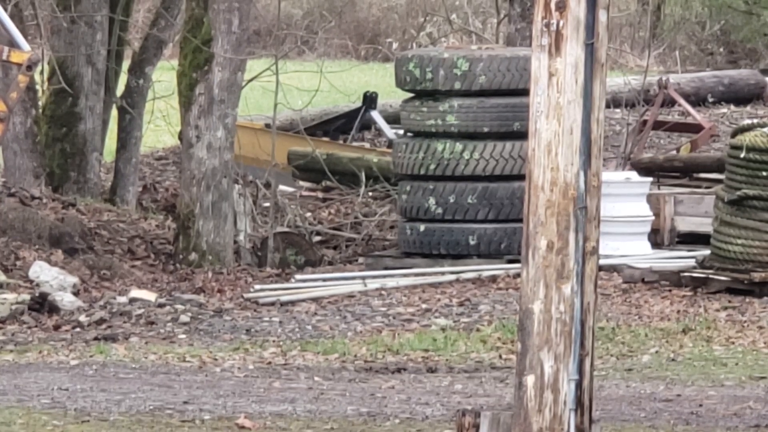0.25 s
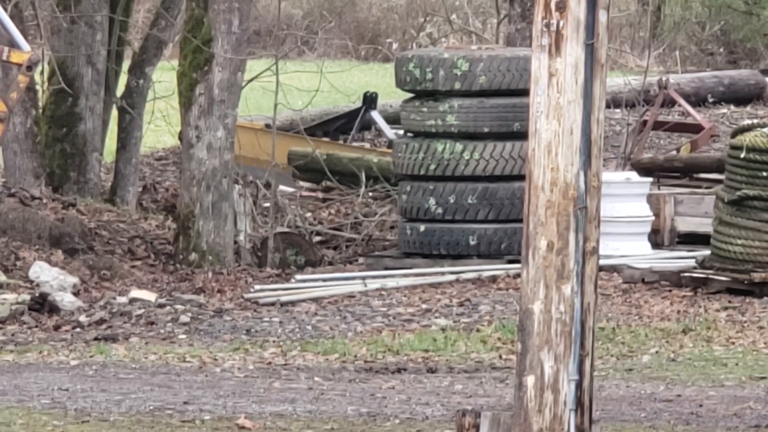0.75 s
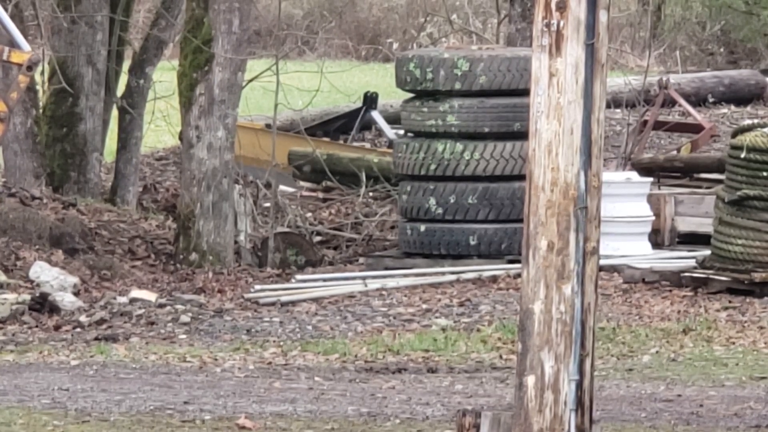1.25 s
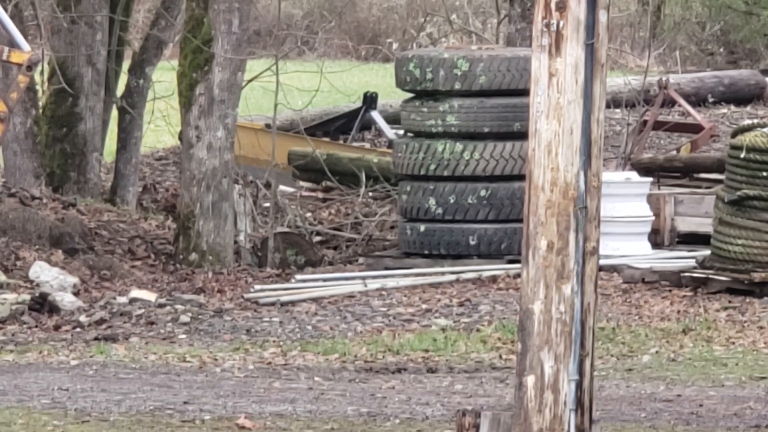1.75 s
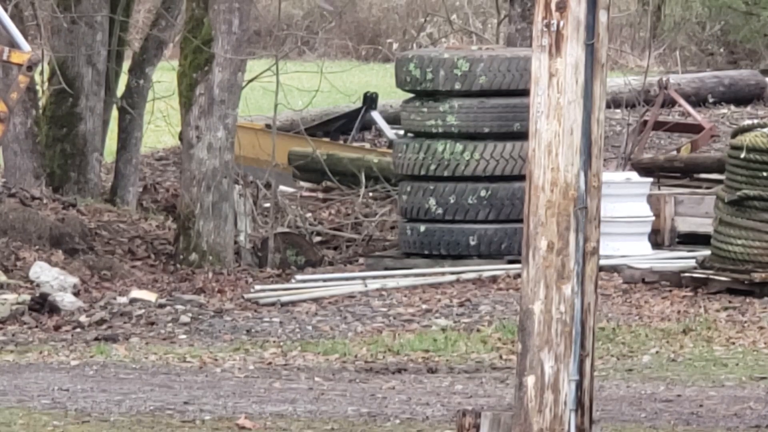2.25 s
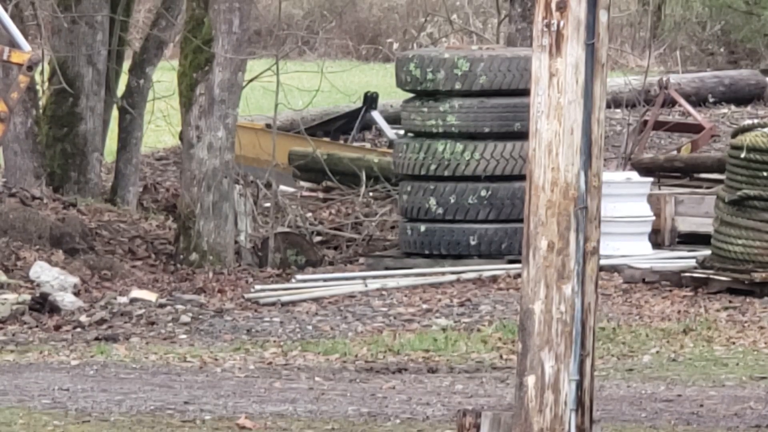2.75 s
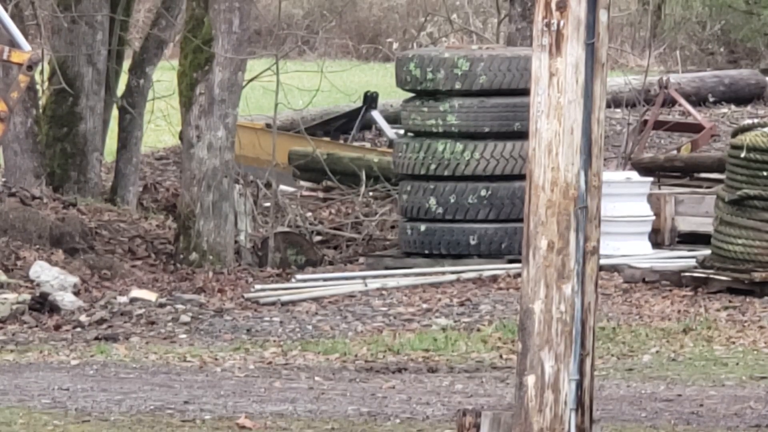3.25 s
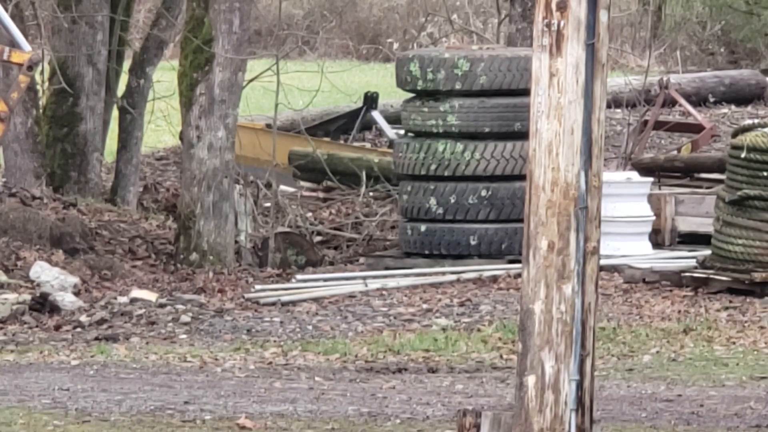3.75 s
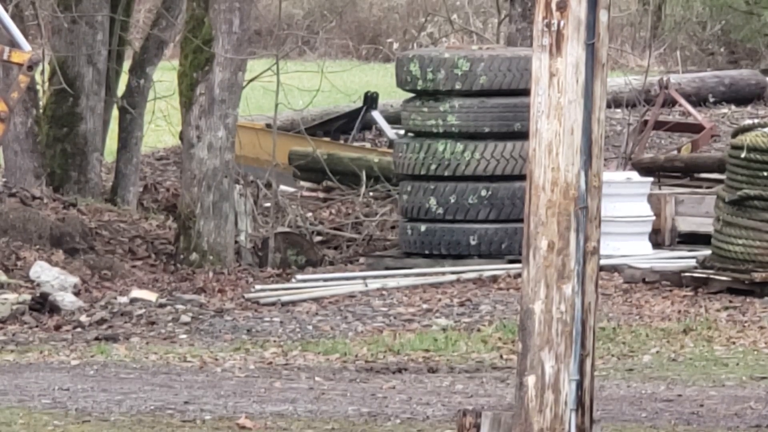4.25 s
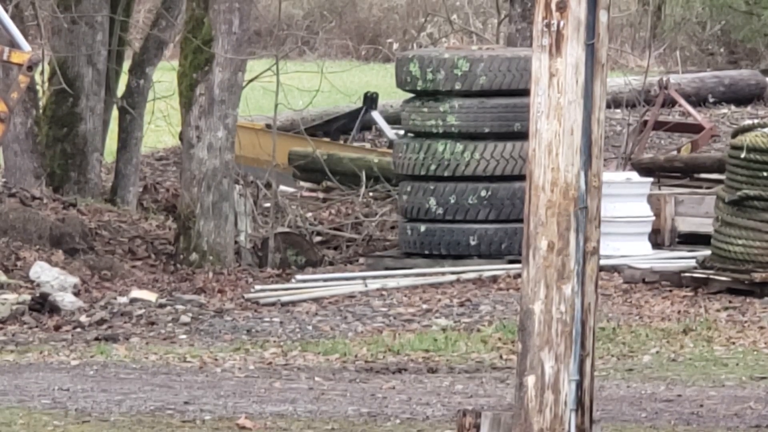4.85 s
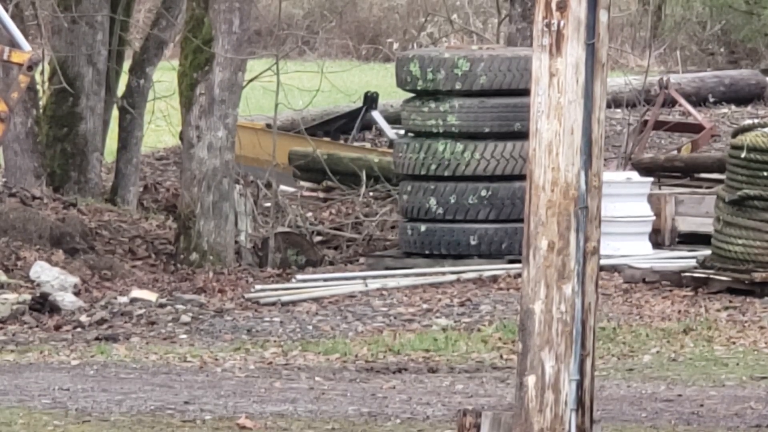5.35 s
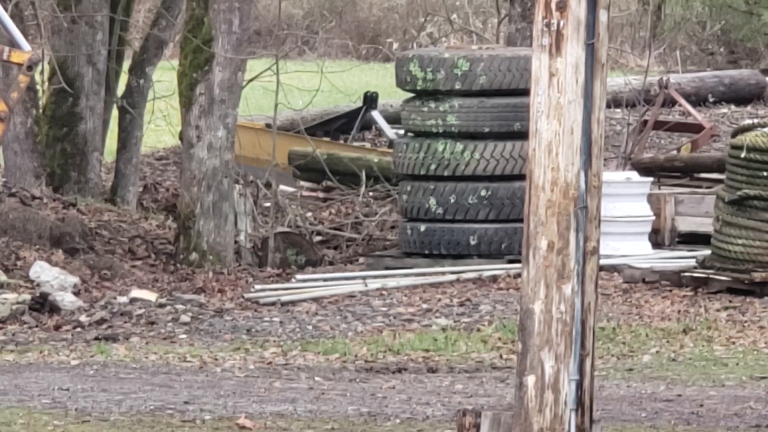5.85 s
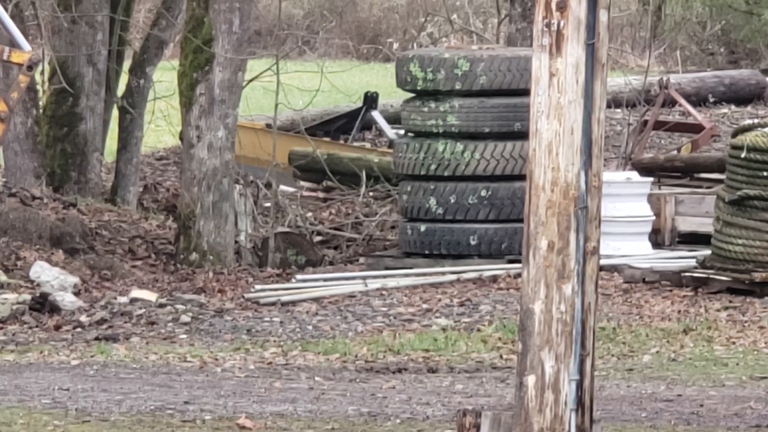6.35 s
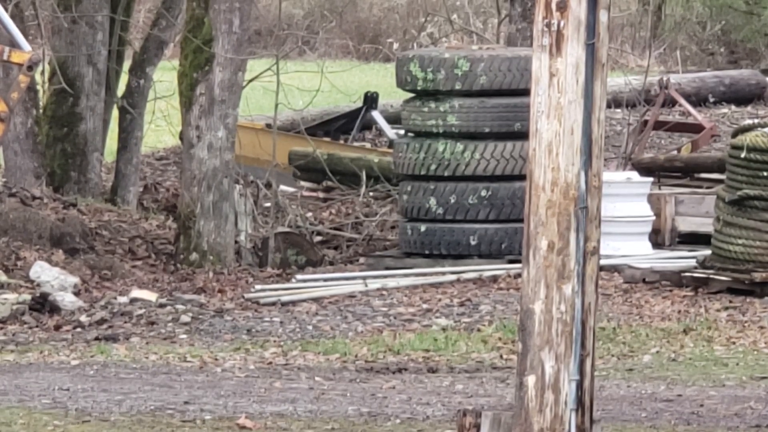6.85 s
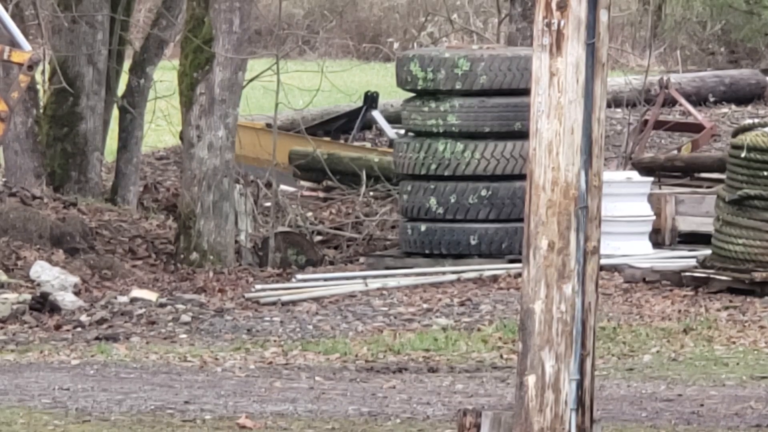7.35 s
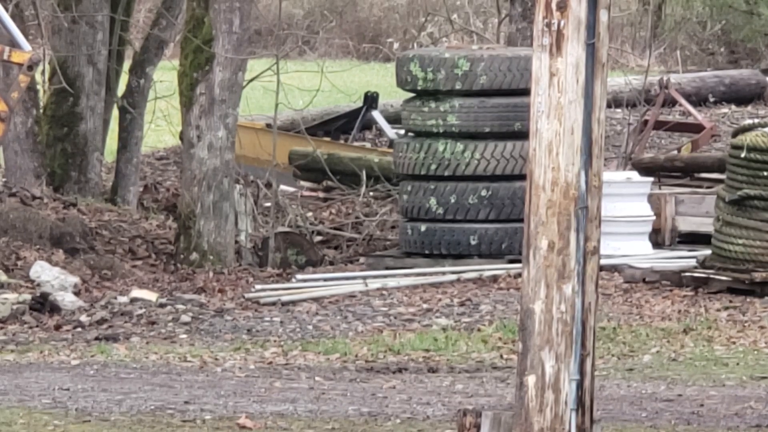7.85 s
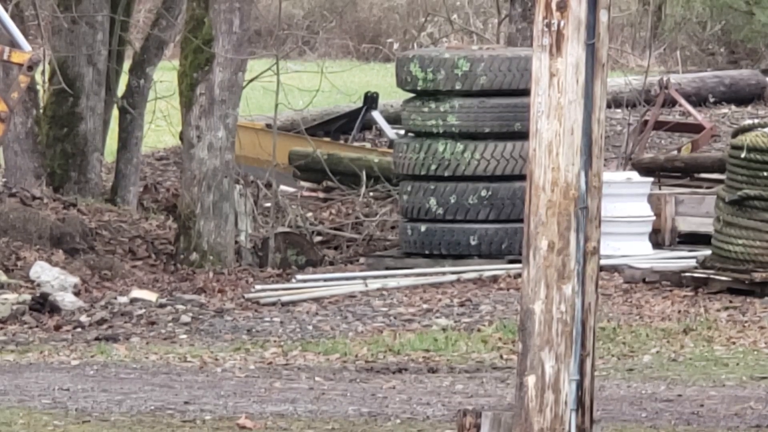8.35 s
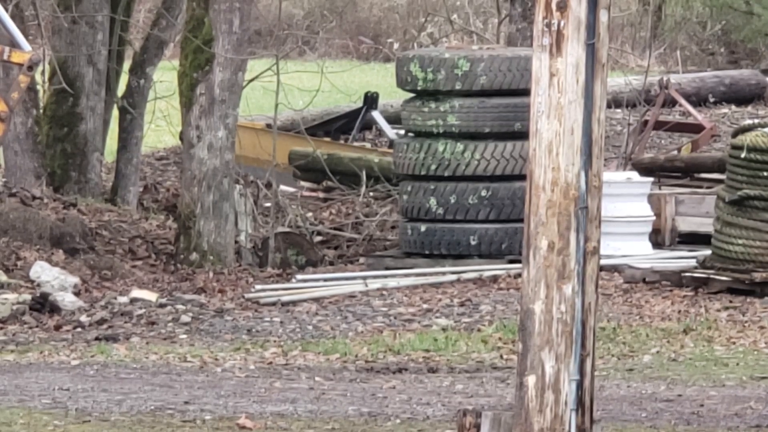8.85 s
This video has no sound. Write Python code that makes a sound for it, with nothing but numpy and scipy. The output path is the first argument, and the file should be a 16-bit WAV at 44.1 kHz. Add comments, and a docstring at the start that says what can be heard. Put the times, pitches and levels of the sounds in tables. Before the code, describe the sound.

Very close to the stereo microphone, a paintball marker fires dozens of crisp metallic snaps, each followed at once by a hissing, hollow gas pop. The nearby trees return a brief rough echo. Firing slows and stops, small trigger ticks follow, then balls knock and roll in a plastic hopper before another string of shots. A low windy rumble lies underneath.

```python
"""A low rumble, partly wind, and the dying echo of an earlier shot, then a paintball marker fires strings of
shots among trees. Each shot close to the two-port microphone is a falling sine click that rings the frame,
a burst of valve hiss, then a gas burst with the ringing barrel; the wood answers with a lumpy noise tail.
Thuds and trigger ticks, made of decaying sines, fall around the shots; faint whistles glide down after lone
ones. In the pause, balls knock and roll in the plastic hopper: struck modes with hiss and scraping noise."""
import sys
import numpy as np
from scipy import signal
from scipy.fft import rfft, irfft
from scipy.io import wavfile
from scipy.ndimage import uniform_filter1d

SR = 44100
rng = np.random.default_rng(int(sys.argv[2]) if len(sys.argv) > 2 else 0)


def unload_wav(signal):
    """Save mono or channel-first audio to the path in sys.argv[1] as 16-bit WAV at rate SR, clipped to [-1, 1]."""
    wavfile.write(
        sys.argv[1],
        SR,
        np.round(np.clip(np.atleast_2d(signal).T, -1, 1) * 32767).astype(np.int16),
    )


N = 401751

# Shots of the marker. Each row: click time in seconds, then click, barrel and gas levels in dB.
SHOTS = [(0.1517, -7.5, -28.5, -25.5), (0.4518, -8, -26.5, -25), (0.7331, -7.5, -27, -25.5),
         (0.851, -7.5, -26.5, -25), (0.9574, -7.5, -25.5, -24), (1.1402, -7.5, -27, -26.5),
         (1.216, -8, -26, -24.5), (1.3211, -7.5, -25.5, -24.5), (1.406, -8.5, -27.5, -26.5),
         (1.5164, -7.5, -27, -25), (1.5997, -8, -27, -25.5), (1.7129, -7.5, -27, -25.5),
         (1.7894, -8.5, -29, -26.7), (1.8935, -8.5, -27, -25), (2.1152, -8.5, -24.5, -24.5),
         (2.234, -9, -27, -26), (2.3513, -8.5, -25.5, -25), (2.5441, -8.5, -26, -24.5),
         (2.6426, -8.5, -27, -26), (2.7604, -8.5, -25.5, -25.5), (2.845, -8.5, -28.5, -26.5),
         (2.9632, -8, -24.5, -24), (3.0675, -8.5, -28, -27), (3.1946, -8.5, -27, -25),
         (3.3818, -7.5, -28, -26.5), (3.6316, -8.5, -25.5, -25.5), (3.7828, -8, -26.5, -25),
         (3.9388, -8, -26, -24.5), (4.0333, -8.5, -28, -25.0), (4.204, -7.5, -29, -26),
         (4.4284, -7, -26.5, -25.5), (4.6266, -7, -25.5, -25), (4.8925, -7, -26.5, -26.5),
         (8.0918, -6.5, -26, -24.5), (8.241, -6, -25, -24), (8.4215, -6.5, -26, -25), (8.6, -6.5, -25, -24),
         (8.7129, -6, -28, -25.5), (8.8866, -6.5, -28.5, -25.5), (9.0616, -6.5, -24, -23.5)]
# Modes of the hopper's plastic shell. Each row: pitch in Hz, time to fall 60 dB in seconds, level in dB.
HOPPER_MODES = [(294, 0.065, -4), (495.5, 0.071, -3), (690, 0.09, -6.5), (825, 0.05, -2), (1064, 0.04, 3.5),
                (1330, 0.0092, 1), (1690, 0.014, -13), (2070, 0.015, -15.5), (2574, 0.017, -2),
                (3760, 0.015, -7.5), (5400, 0.012, -38)]
PORT_LAG = 16  # samples by which the left port hears the marker first
BLAST_S = .0207  # the ball leaves the barrel this many seconds after the click


def undb(db):
    """Amplitude gain of a level in dB."""
    return 10 ** (np.asarray(db) / 20)


def add(out, s, x):
    """Mix x into out from time s in seconds."""
    i = int(round(s * SR))
    out[..., i:i + x.shape[-1]] += x[..., :N - i]


def late(x):
    """Sound reaches the right port after the left."""
    gap = np.zeros(PORT_LAG)
    return np.array([np.r_[x[0], gap], np.r_[gap, x[1]]])


def pair(colour, alike, balance=((100, 0), (200, 0))):
    """Stereo noise of rms 1, shaped by (Hz, dB) points; alike is the share of power common to the ports."""
    log_hz = np.log(np.arange(N // 2 + 1) * SR / N + 1)
    alike = np.clip(alike, 0, 1)
    (hz, db), (pan_hz, pan_db) = np.transpose(colour), np.transpose(balance)
    common, *own = rng.standard_normal((3, N))
    shared = np.array([common, np.roll(common, PORT_LAG)])
    white = np.sqrt(alike) * shared + np.sqrt(1 - alike) * np.array(own)
    gain_db = np.interp(log_hz, np.log(hz), db, -90, -90)
    # half of the left-minus-right balance goes to each side
    gain_db = gain_db + np.interp(log_hz, np.log(pan_hz), pan_db) * np.array([[.5], [-.5]])
    x = irfft(rfft(white) * undb(gain_db), N)
    return x / x.std()


def wobble(size):
    """Random levels held for size samples and slewed."""
    levels = rng.standard_normal(N // size + 1)
    return uniform_filter1d(np.repeat(levels, size), size)[:N]


def rung(hz, t60, db, length=.12):
    """Struck modes: sines that fall 60 dB in t60 seconds, one row a mode, cut off after length seconds."""
    t = np.arange(int(length * SR)) / SR
    hz, t60, db = (np.reshape(v, (-1, 1)) for v in (hz, t60, db))
    return undb(db - 60 * t / t60) * np.sin(2 * np.pi * hz * t)


def surges(rows, from_ms, to_ms):
    """Gain of summed surges that rise, hold and fall along straight lines in dB."""
    ms = np.arange(from_ms, to_ms, 1000 / SR)
    at, db, attack, hold, release = np.transpose(rows)[:, :, None]
    rising, falling = (at - ms) / attack, (ms - at - hold) / release
    return undb(db - 20 * np.maximum(np.maximum(rising, falling), 0)).sum(0)


def blows(events, modes, crack_db, crack_s, focus_db):
    """Each blow rings the same modes, most those near its pitch, under a burst of hiss with a faint tail."""
    # Colour of the contact hiss. Each row: Hz, relative level in dB per Hz.
    hiss_colour = [(350, -49), (600, -6.5), (2090, -7), (2610, -4), (3530, -3.5), (6030, -2), (9110, -14),
                   (13600, -7.5), (16000, -16)]
    ringing, burst = np.zeros((2, 2, N))
    hz, t60, db = np.transpose(modes)
    chances = rng.standard_normal((len(events), 2, len(modes)))
    for (s, peak_db, pan_db, pitch_hz), (detune, uneven) in zip(events, chances):
        # modes lose focus_db for each octave away from the pitch of the blow
        weight_db = db - focus_db * np.abs(np.log2(hz / pitch_hz)) + 3 * uneven
        x = rung(hz * (1 + 0.057 * detune), t60, weight_db).sum(0)
        t = np.arange(len(x)) / SR
        gain = undb(peak_db + np.array([[pan_db], [-pan_db]]) / 2)
        add(ringing, s, late([x, x]) / np.abs(x).max() * gain)
        crack = np.exp(-t / crack_s) + 0.097 * np.exp(-t / 0.032)
        add(burst, s, gain * undb(crack_db) * crack)
    return ringing + burst * pair(hiss_colour, 0.13)


def low_rumble():
    """Low rumble, partly wind, that swells around the shots: noise mostly common to both ports."""
    # Course of the low rumble. Each row: time in seconds, level in dB before the port offsets.
    course = [(0.0, -44), (0.25, -65), (0.6, -61), (0.8, -53), (1.37, -50.5), (1.8, -50), (2.0, -63),
              (2.4, -60), (3.04, -56), (3.6, -63), (4.11, -52.5), (4.5, -62), (4.899, -52), (5.1, -63),
              (5.73, -63), (5.93, -57.5), (6.3, -70), (6.9, -63), (7.94, -53.5), (8.65, -52), (9.11, -57)]
    # Colour of the rumble. Each row: Hz, relative level in dB per Hz.
    rumble_colour = [(15, -42.5), (25, -6), (43, -12.5), (66, -2.5), (146, -10), (178, -20), (204, -17),
                     (400, -34), (520, -77.5), (880, -120)]
    flutter_db = 2.5  # quick unevenness
    port_db = np.array([[6.], [1.2]])  # left, right
    level_db = np.interp(np.arange(N) / SR, *np.transpose(course)) + flutter_db * wobble(size=4000)
    return undb(level_db + port_db) * pair(rumble_colour, 0.81)


def air():
    """A faint steady hiss of coloured noise."""
    # Colour of the hiss. Each row: Hz, relative level in dB per Hz.
    air_colour = [(120, -44), (200, -7), (211, -17.5), (342, -18.5), (961, -18), (4370, -48.5), (7190, -29),
                  (8970, -52), (12100, -35), (16500, -65)]
    return undb(-67.5) * pair(air_colour, 0.24)


def wood():
    """The wood answers each blast: noise that dies fast from near trunks and slowly from afar."""
    # Colour of the answer. Each row: Hz, relative level in dB per Hz.
    wood_colour = [(88, -63.5), (150, -9.5), (311, -1), (594, -4.5), (1210, -6.5), (1470, -13),
                   (6050, -15.5), (9150, -23), (14100, -20.5), (15600, -21.5), (16500, -26.5)]
    near_db, near_t60_s, far_db, far_t60_s = -15, 0.74, -34.5, 3
    earlier_s, earlier_db = 0.06, -21  # a shot fired before the start still echoes
    t = np.arange(2 * SR) / SR
    near = undb(near_db - 60 * t / near_t60_s)
    far = undb(far_db - 60 * t / far_t60_s)
    tail_power = (near ** 2 + far ** 2) * (1 - np.exp(-t / 0.012)) ** 2
    power = np.zeros(N)
    add(power, 0, tail_power[int(earlier_s * SR):] * undb(earlier_db) ** 2)
    for s, _, _, gas_db in SHOTS:
        add(power, s + BLAST_S, tail_power * undb(gas_db) ** 2)
    # separate trunks return the sound in lumps
    return np.sqrt(power) * undb(2.5 * wobble(size=600)) * pair(wood_colour, 0.13)


def thuds():
    """Soft low thuds: one decaying sine each, with a rounded start."""
    # Low thuds. Each row: start in seconds, level in dB before a 5.5 dB lift, pitch in Hz.
    thud_list = [(0.101, -45, 59.2), (4.138, -30, 93), (4.839, -40, 135), (5.081, -34, 63.5),
                 (7.731, -38, 59.2), (8.068, -25, 84)]
    out = np.zeros((2, N))
    for s, db, hz in thud_list:
        x = rung(hz, 0.078, db + 5.5)[0]
        add(out, s, x * (1 - np.exp(-np.arange(len(x)) / SR / 0.0079)))
    return out


def trigger_ticks():
    """The trigger ticks: short bright modes under a crack of hiss."""
    # Ticks. Each row: start in seconds, peak of the ringing in dB, left minus right in dB, pitch in Hz.
    tick_list = [(0.1105, -30, -3, 2680), (3.5394, -45, -12, 6070), (4.136, -27, -2, 4270),
                 (4.4049, -36.5, -5, 2710), (4.825, -53, -10, 2550), (5.207, -34.5, -3, 2670),
                 (5.2867, -34, -1, 6150), (5.3626, -48.5, -6, 3380), (5.3795, -43.5, 2, 6200),
                 (5.5786, -37.5, -1, 6150), (5.6474, -44, 4, 5920), (5.66, -43, -10, 6330),
                 (8.0723, -28.5, -1, 3000)]
    # Modes of the trigger. Each row: pitch in Hz, time to fall 60 dB in seconds, level in dB.
    tick_modes = [(1000, .02, -10), (2700, .012, 0), (4000, .01, -2), (6200, .008, -4), (11500, .006, -6)]
    return blows(tick_list, tick_modes, crack_db=-2.5, crack_s=0.003, focus_db=14.0)


def valve_hiss():
    """Valve noise in three surges: a faint hiss just ahead of the click, then snap and hiss."""
    # Surges. Each row: ms after the click, level in dB, attack ms per 20 dB, hold ms, release ms per 20 dB.
    valve_surges = [(-8.5, -46, 1., 5., 4.), (1.02, -10.5, 1, 0.12, 2.1), (4.5, -19.5, 2.7, 4., 15.)]
    # Colour of the hiss. Each row: Hz, relative level in dB per Hz.
    valve_colour = [(240, -35.5), (400, -6.5), (1870, -13), (3590, -4), (5220, -13), (7460, -13.5),
                    (8450, -22.5), (11400, -10), (15300, -11.5), (16500, -24)]
    hiss = surges(valve_surges, -6, 24)
    power = np.zeros(N)
    for s, click_db, _, _ in SHOTS:
        add(power, s - .006, (hiss * undb(click_db)) ** 2)
    return np.sqrt(power) * pair(valve_colour, 0.067)


def valve_click():
    """The valve snaps: a sine of two or three cycles that sags in pitch as it dies, with early echoes."""
    # Returns from the marker and the ground. Each row: left lag in ms, right lag in ms, level in dB.
    click_echoes = [(4.75, 3.85, -10), (5.75, 4.85, -13), (8.9, 8.6, -16)]
    click_hz = 3085  # starts 6 % above this and falls
    side_db, length_ms = np.array([[-0.5], [1]]), np.array([[.55], [.68]])  # left, right
    ms = np.arange(SR // 30) * 1000 / SR
    tone = np.sin(2 * np.pi * click_hz * ms * (1.06 - .1 * ms) / 1000)
    click = undb(side_db) * tone * np.exp(-(ms / length_ms) ** 3)
    clicks = click
    for *lags, db in click_echoes:
        echo = np.array([np.roll(c, int(lag * SR / 1000)) for c, lag in zip(click, lags)])
        clicks = clicks + undb(db) * echo
    out = np.zeros((2, N))
    for s, click_db, _, _ in SHOTS:
        add(out, s, late(clicks) * undb(click_db))
    return out


def frame():
    """The valve rings the frame: decaying modes with a softened start, at the level of the click."""
    # Frame modes. Each row: pitch in Hz, time to fall 60 dB in seconds, left level in dB, right level in dB.
    frame_modes = [(172.5, 0.027, -15.5, -19), (270, 0.011, -18.5, -15.5), (846, 0.049, -20, -17.5),
                   (1129, 0.16, -20.5, -22), (1400, 0.006, -14, -16), (2370, 0.025, -16.5, -18),
                   (3900, .04, -27.5, -31.5)]
    hz, t60, *sides = np.transpose(frame_modes)
    ring = -np.array([rung(hz, t60, db).sum(0) for db in sides])
    ring = ring * (1 - np.exp(-np.arange(ring.shape[1]) / SR / .0015))
    out = np.zeros((2, N))
    for s, click_db, _, _ in SHOTS:
        add(out, s, late(ring) * undb(click_db))
    return out


def barrel():
    """The blast rings the barrel's air column: sines under surges, the low modes slower than the high."""
    # Modes of the air column. Each row: pitch in Hz, left level in dB, right level in dB.
    barrel_modes = [(60, -14, -7.5), (144.7, -8.5, -12), (194.4, -11.5, -15.5), (270, 0, -2),
                    (298, -1, 2.5), (347.6, -2, -5), (455, -8.5, -8), (563, -41, -24.5), (690.7, -29, -13),
                    (803, -7.5, -9), (879.2, -5.5, -32.5), (987, -26.5, -8.5), (1097, -29.5, -9.5),
                    (1219.5, -7, -29), (1473, -25, -14), (1780, -21.5, -14), (2780, -22, -17)]
    # Both surge tables, each row: ms after the blast, dB, attack ms per 20 dB, hold ms, release ms per 20 dB.
    ring_low = [(6.53, 6.5, 9., 5.28, 6.), (25.6, -5.5, 6.8, 0.1, 7.5), (15., -14.5, 11, 4., 75.)]  # swell, second beat and tail
    ring_high = [(4., 6.5, 6.8, 0.1, 5), (21.3, 2, 6., 0.092, 3.5), (7., -5, 6., 18., 30.)]  # crack, second beat and tail
    hz, *side_db = np.transpose(barrel_modes)
    low = (hz < 400)[:, None]
    ring = np.where(low, surges(ring_low, -1, 110), surges(ring_high, -1, 110))
    t = np.arange(ring.shape[1]) / SR - .001  # seconds from the blast
    out = np.zeros((2, N))
    # every shot strikes the same column, each mode a little differently
    for (s, _, barrel_db, _), chance in zip(SHOTS, rng.standard_normal((len(SHOTS), len(hz)))):
        shot_hz = hz * (1 + 0.0034 * chance)
        column = np.sin(2 * np.pi * shot_hz[:, None] * t) * undb(2.3 * chance)[:, None]
        add(out, s + BLAST_S + t[0], late(undb(side_db) @ (column * ring)) * undb(barrel_db))
    return out


def muzzle_gas():
    """Gas leaves the barrel: noise in three spurts over a steady flow and its tail."""
    # Surges. Each row: ms after the blast, level in dB, attack ms per 20 dB, hold ms, release ms per 20 dB.
    gas_surges = [(0.34, 9, .6, 0.077, 2.2), (4.5, 5.5, 2.1, 0.1, 2.1), (12., 4, 4., 0.1, 3.9),
                  (0.8, 1, 1.2, 20.1, 17), (20., -16, 9.7, 11, 100)]
    # Colour of the gas. Each row: Hz, relative level in dB per Hz.
    gas_colour = [(290, -25), (500, -9), (1190, -13.5), (1640, -14), (2040, -13), (2260, -14), (2690, -9.5),
                  (5040, -14), (7270, -8.5), (8930, -15.5), (14000, -5.5), (15800, -9.5), (16500, -38)]
    # Stereo balance of the gas. Each row: Hz, left minus right in dB.
    gas_balance = [(500, 12), (2000, -1), (5500, 3), (7400, -5), (9500, 3), (13000, -6), (16000, 3)]
    spurts = surges(gas_surges, -2, 90)
    power = np.zeros(N)
    for s, _, _, gas_db in SHOTS:
        add(power, s + BLAST_S - .002, (spurts * undb(gas_db)) ** 2)
    return np.sqrt(power) * pair(gas_colour, 0.063, gas_balance)


def whistles():
    """Faint whistles after lone shots: sines that glide down and swell and fade."""
    # Whistles. Each row: start in seconds, length in seconds, start pitch in Hz, end pitch in Hz, level in dB.
    whistle_list = [(4.3, .12, 520, 410, -54), (4.51, .12, 520, 420, -55), (4.72, .16, 530, 395, -52),
                    (4.99, .14, 520, 395, -52)]
    out = np.zeros((2, N))
    for s, length, start_hz, end_hz, db in whistle_list:
        u = np.linspace(0, 1, int(length * SR))
        glide_hz = start_hz + (end_hz - start_hz) * u
        tone = np.sin(2 * np.pi * np.cumsum(glide_hz) / SR)
        add(out, s, undb(db) * np.sin(np.pi * u ** 1.4) * tone)
    return out


def rolling(rate=30, spots=12):
    """Dense small collisions of balls ring the hopper, each spot at its own pitch; their shells scrape."""
    # Course of the rolling. Each row: time in seconds, level in dB, treble in dB above the level.
    roll = [(6.1, -68.5, -26), (6.22, -47.5, 6.5), (6.3, -48.5, 0), (6.5, -48.5, -8), (6.64, -52.5, -14),
            (6.69, -64, -13), (6.74, -54.5, 3.5), (6.82, -51, -3), (6.95, -53, 2), (7.09, -55.5, -7),
            (7.3, -52.5, -5), (7.52, -55, -5.5), (7.72, -57, -8), (7.94, -59.5, -16), (7.96, -49.5, -3.5),
            (8.08, -52, -6)]
    # Rattle of the loose mode near 2.5 kHz. Each row: time in seconds, dB against the rest of the treble.
    rattle_course = [(6.1, -15), (6.7, -11.5), (6.95, -11), (7.2, -2.5), (7.55, -3.5), (7.7, -7.5),
                     (8.08, -2)]
    # Colour of the scrape. Each row: Hz, relative level in dB per Hz.
    scrape_colour = [(2060, -40), (3500, 0.5), (4800, 0), (5970, -3), (6700, 3), (7270, 7.5), (8000, -3.5),
                     (8800, -34), (12100, 1.5), (16000, -11)]
    patchy_db = 6  # balls touch each spot in fits and starts
    scrape_db, scrape_per_treble, scrape_flicker_db = -14, 0.9, 7  # follows the treble, unevenly
    s, low_db, high_db = np.transpose(roll)
    t = np.arange(N) / SR
    hz, t60, db = np.transpose(HOPPER_MODES)
    treble = hz > 1300
    loose = np.abs(hz - 2500) < 250
    low, high, rattle = np.zeros((3, 2, N))
    a, b = int(s[0] * SR), int(s[-1] * SR)
    for detune in rng.standard_normal((spots, len(hz))):
        # sparse hits, rate a second, over a faint steady grain
        hits = (rng.random((2, b - a)) < rate / SR) * rng.standard_normal((2, b - a))
        hits = hits + 0.014 * rng.standard_normal((2, b - a))
        hits = hits * undb(patchy_db * wobble(size=2500)[a:b])
        hits = uniform_filter1d(hits, size=4)  # soft shells: each contact lasts a tenth of a ms
        hits = late([hits[0], 0.78 * hits[0] + 0.93 * hits[1]])
        modes = rung(hz * (1 + .09 * detune), t60, db)
        for part, chosen in ((low, ~treble), (high, treble & ~loose), (rattle, loose)):
            add(part, s[0], signal.fftconvolve(hits, modes[chosen].sum(0)[None]))
    rattle_db = np.interp(t, *np.transpose(rattle_course)) + 4.3 * wobble(size=900)
    high = high / high[:, a:b].std() + undb(rattle_db) * rattle / rattle[:, a:b].std()
    treble_db = np.interp(t, s, high_db)
    flicker_db = scrape_flicker_db * wobble(size=2000)
    scrape = undb(scrape_db + scrape_per_treble * treble_db + flicker_db) * pair(scrape_colour, 0.1)
    balls = undb(4.0) * low / low[:, a:b].std() + undb(treble_db + 4.0) * high
    gain = undb(np.interp(t, s, low_db, -120, -120) + np.array([[1.2], [-1.2]]))
    return gain * (balls + scrape)


def knocks():
    """Single balls knock the hopper and ring its shell under a weak crack of hiss."""
    # Knocks. Each row: start in seconds, peak of the ringing in dB, left minus right in dB, pitch in Hz.
    knock_list = [(6.148, -34, 2, 490), (6.175, -32, -1, 468), (6.21, -14.5, 2.0, 692), (6.25, -21, 4, 490),
                  (6.276, -31, -1, 490), (6.3, -21, 3, 797), (6.452, -23.5, 5, 479.5),
                  (6.574, -30.5, 4, 692), (6.596, -34, -6, 692), (6.636, -34, -6, 484),
                  (6.706, -44, 3, 466), (6.732, -33.5, 3, 1000), (6.783, -26, 2, 455), (6.809, -18, 3, 700),
                  (6.826, -28.5, -20, 450), (6.89, -23, 1.5, 441), (6.94, -25, 1, 444),
                  (6.983, -34, 2, 429), (7.17, -40, -1, 441), (7.405, -37, 1, 536), (7.518, -33, 0.0, 407),
                  (7.658, -44, 4, 522), (7.723, -41, -15, 482), (7.774, -35, -8, 1040),
                  (7.809, -42, -3, 486), (7.954, -30.5, 0, 538)]
    return blows(knock_list, HOPPER_MODES, crack_db=-27.5, crack_s=0.0041, focus_db=6.9)


def hopper():
    """The thin plastic of the hopper radiates no bass: a high-pass at 290 Hz."""
    thin_plastic = signal.butter(4, 290, "high", fs=SR, output="sos")
    return signal.sosfilt(thin_plastic, rolling() + knocks())


def scene():
    """Surroundings, the marker's shots and small noises, and the hopper, summed."""
    surroundings = low_rumble() + air() + wood()
    shots = valve_hiss() + valve_click() + frame() + barrel() + muzzle_gas()
    return surroundings + thuds() + trigger_ticks() + shots + whistles() + hopper()


def record(dry):
    """The recorder cuts the top above 15.9 kHz with a steep low-pass."""
    return signal.sosfilt(signal.ellip(8, .2, 70, 15900, fs=SR, output="sos"), dry)


dry = scene()
out = record(dry)
unload_wav(out)
```